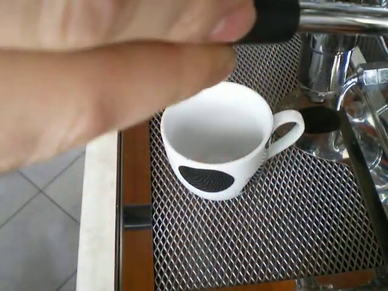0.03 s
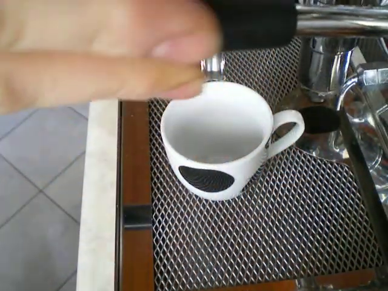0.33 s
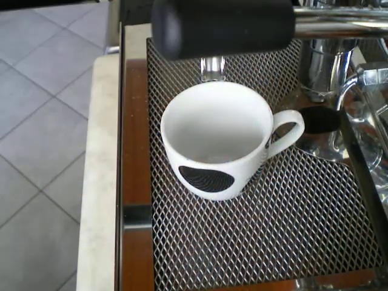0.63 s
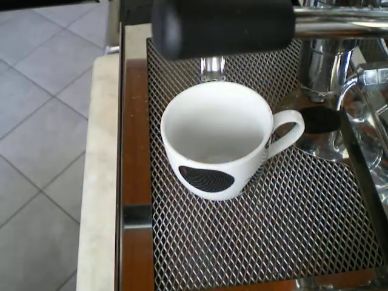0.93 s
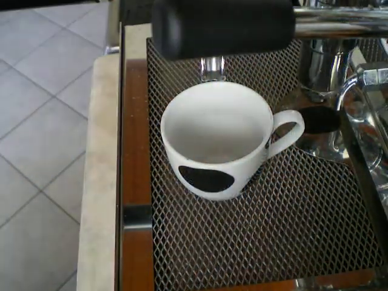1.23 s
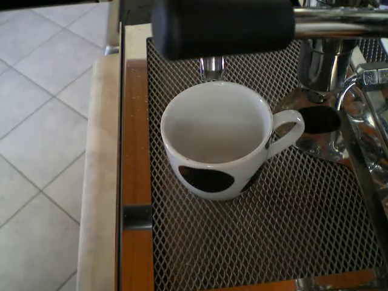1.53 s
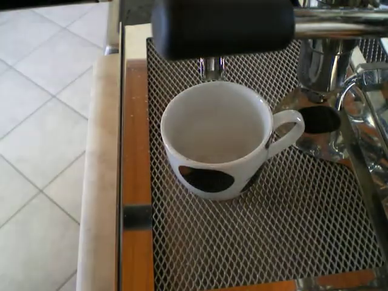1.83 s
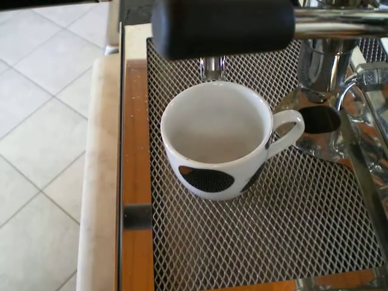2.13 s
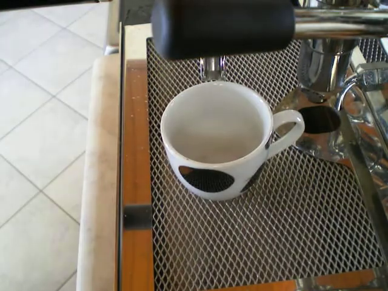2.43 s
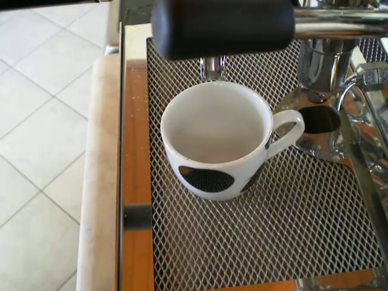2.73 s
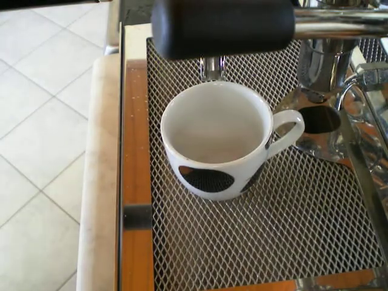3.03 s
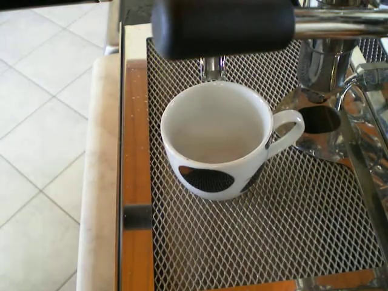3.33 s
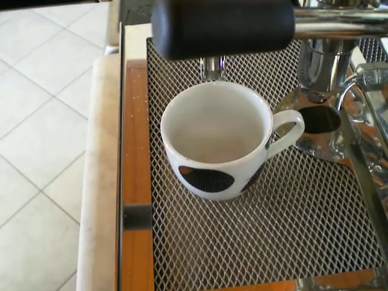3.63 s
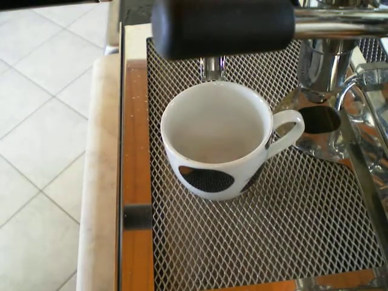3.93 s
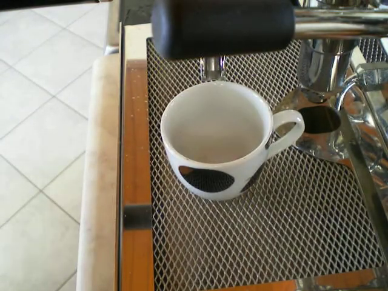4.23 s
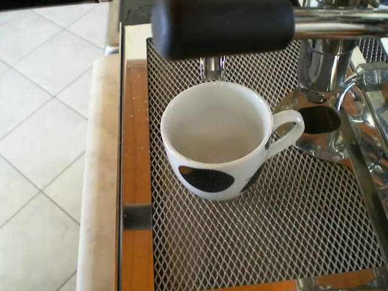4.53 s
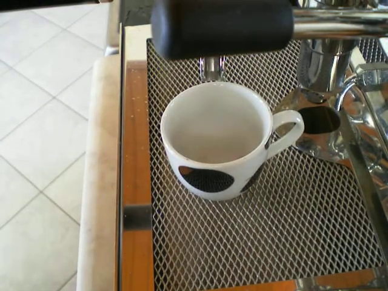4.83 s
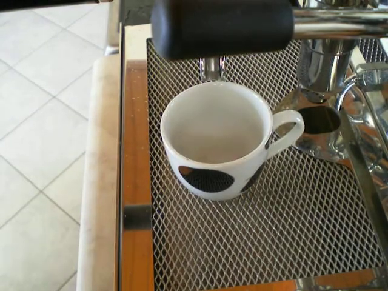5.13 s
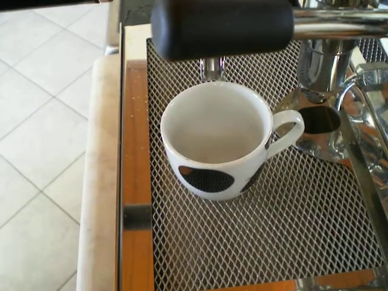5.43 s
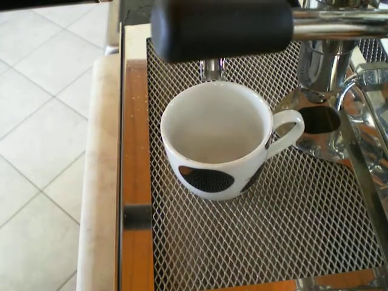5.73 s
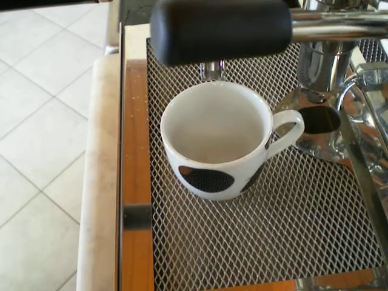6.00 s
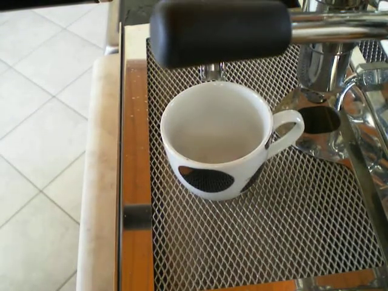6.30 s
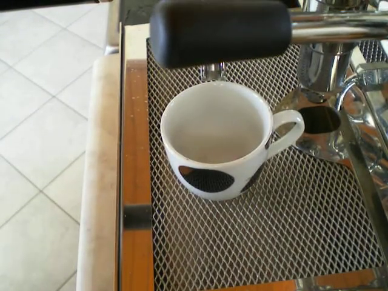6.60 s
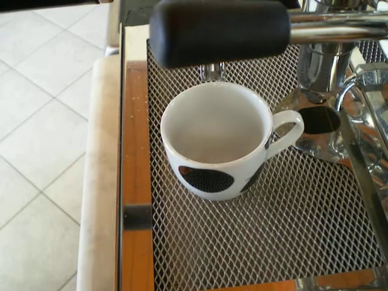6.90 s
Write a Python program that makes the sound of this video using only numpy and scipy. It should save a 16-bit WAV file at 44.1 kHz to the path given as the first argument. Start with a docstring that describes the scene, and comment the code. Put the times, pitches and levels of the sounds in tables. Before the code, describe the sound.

An espresso machine's pump is already running at the start and continues for the whole seven seconds or so, heard indoors from just above the cup. The main sound is a steady, low motor hum with several overtones that gently swell and recede. A fast, fine buzz from the loose casing and an even rush of water in the pipes fill it out. At about 1.4 seconds there is one thin click over a soft thud. A faint high whistle wavers behind the hum, rising a little between 1.5 and 2.3 seconds, again around 3.5 to 4 seconds, and briefly near 6.7 seconds. From about 6.2 seconds the pump eases slightly: the low part thins and the higher tones come forward, but it keeps running. The overall sound is close and somewhat dull, with little treble.

```python
"""Just above the cup at an espresso machine, whose rotary pump runs steadily.
The shaft turns 25 times a second, so mains hum and the pump vanes give a harmonic series of tones.
The loose casing knocks once a turn, a buzz that fills the gaps between them. Water rushing through
the pipes gives turbulent noise that rings in the panels. A faint whistle near 1902 Hz, at the pump's
76th harmonic, swells and sometimes goes slightly sharp. One thin click is heard over a soft thud."""
import sys
import numpy as np
from scipy import signal
from scipy.fft import rfft, irfft
from scipy.io import wavfile

SR = 44100
rng = np.random.default_rng(int(sys.argv[2]) if len(sys.argv) > 2 else 0)


def unload_audio(sound):
    """Save the sound as a 16-bit wav file, at the path given as the first command line argument."""
    columns = np.transpose(np.atleast_2d(sound))
    # keep every value between -1 and 1, then stretch to whole-number steps
    steps = np.round(np.clip(columns, -1, 1) * 32767)
    wavfile.write(sys.argv[1], SR, steps.astype(np.int16))


N = 315756
TIME = np.arange(N) / SR
SHAFT_HZ = 25.02


def amp(db):
    """Amplitude ratio of a level in decibels."""
    return 10 ** (np.asarray(db) / 20)


def unit_rms(x):
    """Normalisation to unit mean power."""
    return x / np.sqrt(np.mean(abs(x) ** 2) + 1e-20)


def contour(rows):
    """Linear interpolation of a level in time."""
    return np.interp(TIME, *np.transpose(rows))


def swell(middle_s, half_s):
    """Gaussian envelope: 1 at its middle, 1/e at half_s to either side."""
    return np.exp(-((TIME - middle_s) / half_s) ** 2)


def wander(rate_hz, count=2048):
    """Low-pass random process of rms 1, mostly below the given rate."""
    f = np.fft.rfftfreq(count, N / SR / count)
    slow = irfft(rfft(rng.standard_normal(count)) / (1 + (f / rate_hz) ** 2))
    return np.interp(TIME, np.linspace(0, N / SR, count), unit_rms(slow))


def low_pass(x, hz, taps):
    """Steep linear-phase low-pass filter."""
    return signal.oaconvolve(x, signal.firwin(taps, hz, window=("kaiser", 9), fs=SR), "same")


def response_db(hz, spectrum, resonances):
    """Source and filter: a smooth spectrum plus Lorentzian peaks and dips, summed in decibels."""
    f, db = np.transpose(spectrum)
    peaks = sum(gain / (1 + (2 * (hz - centre) / width) ** 2) for centre, width, gain in resonances)
    return np.interp(np.log(hz + 1), np.log(f), db) + peaks


# A tiny click over a thud: t/s, click level/dB, thud level/dB
TRANSIENTS = [(1.4231, -14, -15)]

def click(decay_s=0.00016, thud_s=0.0036, thud_hz=95):
    """Exponential decay: a step that dies at once, over a heavily damped low oscillation."""
    out = np.zeros(N)
    for start_s, click_db, thud_db in TRANSIENTS:
        age = np.maximum(TIME - start_s, 0)
        out += amp(click_db) * (age > 0) * np.exp(-age / decay_s)
        thud_envelope = age / thud_s * np.exp(1 - age / thud_s)
        out += amp(thud_db) * thud_envelope * np.cos(2 * np.pi * thud_hz * age)
    return out


# Swells of the whistle: middle t/s, half length/s, added level/dB, f/Hz above its base note
WHISTLE_SWELLS = [(.85, .4, -44.5, 9.7), (1.549, 0.076, -36.5, 4.6), (2.04, 0.084, -33.5, 0.79),
                  (2.271, 0.061, -31.5, 19), (3.547, .22, -34, 2.02), (4.025, .12, -31, 0.88),
                  (5.795, 0.11, -43, 4), (6.74, 0.13, -37.5, 0.74)]

def whistle(note_hz=1902, steady_db=-42.5, steady_sharp_hz=4, shiver=0.26):
    """Modulation: a faint tone near the pump's 76th harmonic swells and sometimes goes slightly sharp."""
    strength, sharp_hz = amp(steady_db), steady_sharp_hz
    for middle_s, half_s, db, hz in WHISTLE_SWELLS:
        envelope = swell(middle_s, half_s)
        strength += amp(db) * envelope
        sharp_hz += (hz - steady_sharp_hz) * envelope
    waver_hz = 3 + 0.58 * sharp_hz  # the note frays as it goes sharp
    cycles = np.cumsum(note_hz + sharp_hz + waver_hz * wander(30)) / SR
    strength *= unit_rms(1 + shiver * wander(9.9))
    return np.sqrt(2) * strength * np.sin(2 * np.pi * cycles)


# Noise spectrum of pump and water: f/Hz, relative spectral density level/dB
RUSH_SPECTRUM = [(25, -30.5), (60, -20), (105, -11), (165, -13.5), (235, -4), (330, -6), (500, -7.5),
                 (1050, -7), (1330, -8.5), (1580, -16), (2050, -12), (3000, -13.5), (3500, -16),
                 (4250, -38)]
# Resonances and antiresonances of the drip tray and panels: f/Hz, width/Hz, gain/dB
PANEL_MODES = [(293, 14, 2), (341, 23, -4.5), (412, 22, 4), (582, 42, 6.5), (671, 61, 8), (715, 43, -7),
               (850, 37, 9.5), (923, 35, -4), (997, 55, 8.5), (1074, 25, 4), (1926, 75, 7), (2416, 27, 6),
               (2907, 55, 4.5)]
# Course of the whole rush: t/s, relative level/dB
FLOW_LEVEL = [(0.0, -27), (0.42, -25.5), (0.68, -27), (1.65, -23.5), (1.83, -25), (1.87, -23.5),
              (2.87, -26), (4.17, -25.5), (4.81, -26), (6.34, -25.5), (6.56, -24.5), (7.16, -28)]
# Course of its low churning: t/s, gain/dB
CHURN_GAIN = [(0, 4.5), (.9, -0.5), (2, 0), (6.1, 0), (6.7, -5), (7.16, -8)]

def water_rush(angle, gain_db=1, grain_db=1.0, flutter_db=0.5, churn_hz=560):
    """Broadband excitation: turbulence and fine rattle, stronger once a turn, ring in the panels."""
    throb = 1 + 0.14 * np.cos(angle) + 0.026 * np.cos(2 * angle) + 0.039 * np.cos(6 * angle)
    drive = rng.standard_normal(N) * throb
    drive *= amp(grain_db * wander(110) + flutter_db * wander(7.1))
    response = amp(response_db(np.fft.rfftfreq(N, 1 / SR), RUSH_SPECTRUM, PANEL_MODES))
    noise = unit_rms(irfft(rfft(drive) * response, N))
    churn = low_pass(noise, churn_hz, taps=801)
    hiss = noise - churn
    return amp(gain_db + contour(FLOW_LEVEL)) * (hiss + amp(contour(CHURN_GAIN)) * churn)


# Spectral envelope of the buzz: f/Hz, base level of a harmonic/dB
BUZZ_SPECTRUM = [(50, -49.5), (125, -57.5), (175, -40), (500, -39.5), (800, -38.5), (1320, -43.5),
                 (1420, -55), (3250, -60.5)]
# Resonances and antiresonances of the casing: f/Hz, width/Hz, gain/dB
CASING_MODES = [(275, 25, -8), (535, 30, -7), (725, 18, -12), (900, 51, -10), (1090, 78, 4),
                (1755, 45, 10.5), (2960, 130, 9.5)]

def casing_buzz(angle, drift_db=1.27, even_limit=130, odd_limit=42):
    """Periodic impact: one knock a turn gives harmonics between the strong tones, each drifting alone."""
    lags = np.cumsum(rng.normal(0, 1.4, size=even_limit))  # the panels smear the knock
    orders = {*range(2, even_limit, 2), *range(5, odd_limit, 2)}
    orders -= {round(row[0]) for row in PUMP_HARMONICS}
    odd_db = -3 - TIME  # the knock settles by 1 dB/s as pressure builds
    whine_db = -4.5 + TIME  # while the high whine grows
    out = np.zeros(N)
    for order in sorted(orders):
        hz = order * SHAFT_HZ
        whine_share = np.interp(hz, [1050, 1800], [0, 1])
        level_db = response_db(hz, BUZZ_SPECTRUM, CASING_MODES) + drift_db * wander(1.8)
        level_db += order % 2 * odd_db + whine_share * whine_db
        out += amp(level_db) * np.cos(order * angle + lags[order])
    return np.sqrt(2) * out


# Strong tones: shaft harmonic number, starting level/dB, slope/(dB/s), added slope on easing/(dB/s)
PUMP_HARMONICS = [(4, -24, 0, -5.5), (6, -47, -2, -3), (8, -39.5, 2, -10), (10, -36, 1.61, -2),
                  (12, -39, 1.7, -1.5), (16, -30, -1, -11), (18, -39, -.2, 6), (20, -38.5, -0.74, 2),
                  (24, -34, -0.7, -2), (26, -39, 1.61, -12.5), (32, -39, 0.23, 2.5), (34, -35, -1.44, 0.5),
                  (42, -40.5, 1, -3), (50, -46, 1, 1), (54, -49, 2.12, -2.5), (68, -58, -0.4, 10)]
# A panel rings along with one tone: middle t/s, half length/s, shaft harmonic number, added level/dB
PANEL_SWELLS = [(0.597, 0.23, 8, -37.5), (0.602, 0.21, 34, -33), (0.79, 0.26, 24, -36),
                (1.05, .4, 16, -29.5), (1.9, 1, 18, -38), (2.3, .9, 10, -38.5), (2.499, 0.54, 34, -38.5),
                (2.603, 1, 12, -25.5), (3.196, 1.1, 24, -33.5), (4, 0.62, 8, -40.5), (4.401, .7, 26, -33.5),
                (4.8, 1.08, 12, -24), (6, 0.16, 24, -35.5), (6.1, 0.68, 20, -39), (6.598, .7, 6, -37),
                (6.75, 0.25, 24, -34), (6.84, 0.24, 26, -29), (7.05, 0.32, 68, -37.5), (7.08, .25, 34, -26)]

def pump_hum(angle, vanes=4, aligned_hz=425, ease_s=6.23):
    """Forced vibration: low vane harmonics add in phase, one push per vane; the casing scatters the rest."""
    eased_s = np.maximum(TIME - ease_s, 0)  # the pump eases as it nears full pressure
    out = np.zeros(N)
    for order, start_db, slope, easing in PUMP_HARMONICS:
        order = round(order)
        strength = amp(start_db + slope * TIME + easing * eased_s)
        for middle_s, half_s, ring_order, ring_db in PANEL_SWELLS:
            if round(ring_order) == order:
                strength += amp(ring_db) * swell(middle_s, half_s)
        quadrature = np.pi / 2 * (order % vanes > 0)
        scatter = rng.uniform(0, 2 * np.pi) * (order * SHAFT_HZ > aligned_hz)
        unsteady = 1 + 0.004 * order * wander(7)
        out += strength * unsteady * np.cos(order * angle + quadrature + scatter)
    return np.sqrt(2) * out


def scene():
    """Superposition: hum, buzz and rush, driven by one shaft angle, add to the faint whistle."""
    angle = 2 * np.pi * SHAFT_HZ * TIME + 0.012 * wander(0.54)  # held nearly steady by the mains
    return (pump_hum(angle) + casing_buzz(angle) + water_rush(angle) + whistle())[None]


def record(dry):
    """Band limiting: a narrow microphone passes the speech band; only the click reaches above it."""
    narrow = low_pass(dry[0], hz=4350, taps=601)
    return low_pass(narrow + click(), hz=16000, taps=255)[None]


dry = scene()
out = record(dry)
unload_audio(out)
```